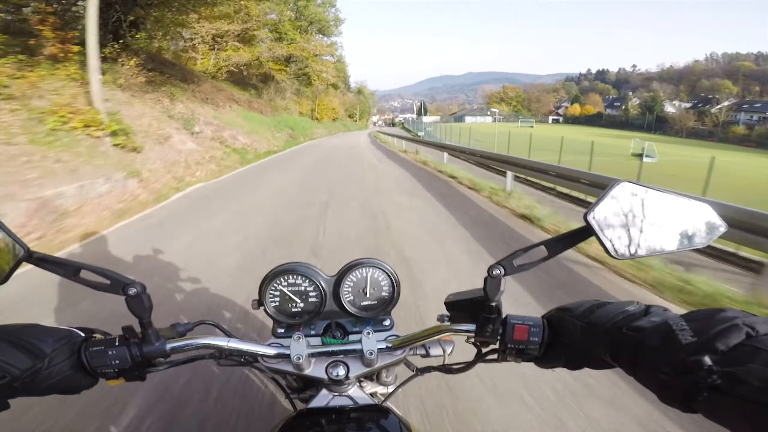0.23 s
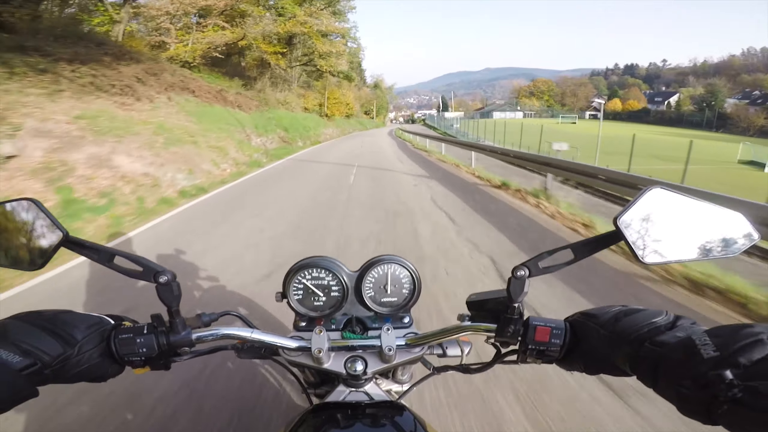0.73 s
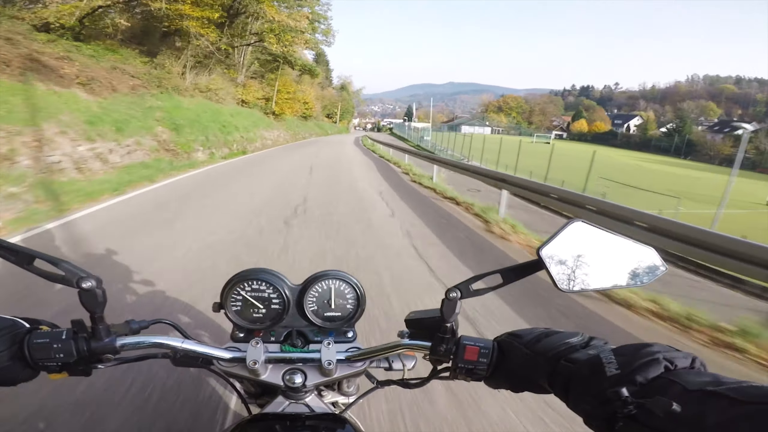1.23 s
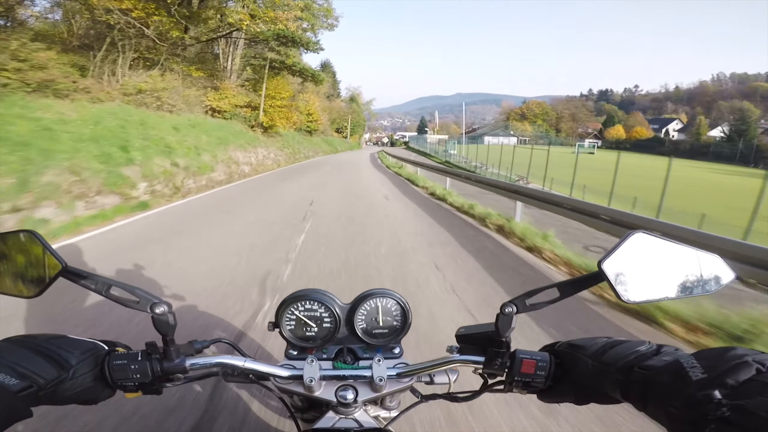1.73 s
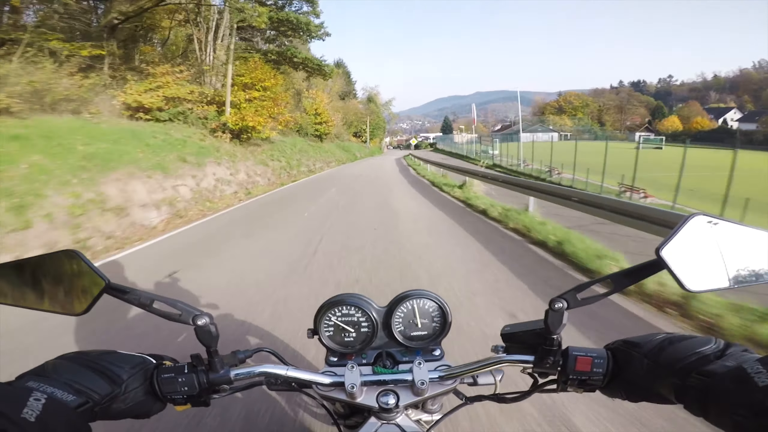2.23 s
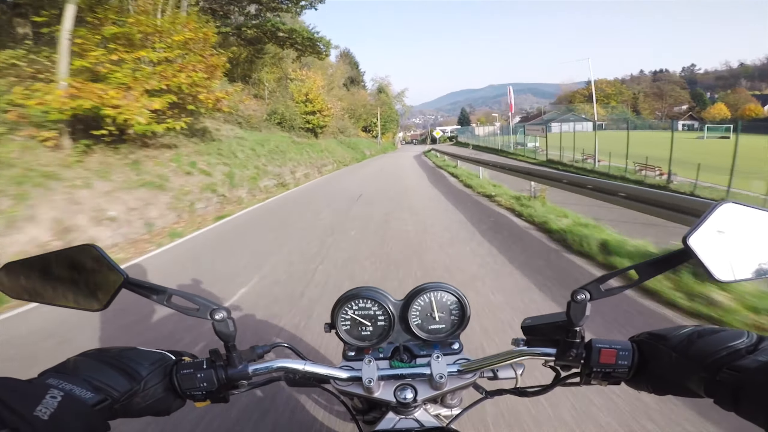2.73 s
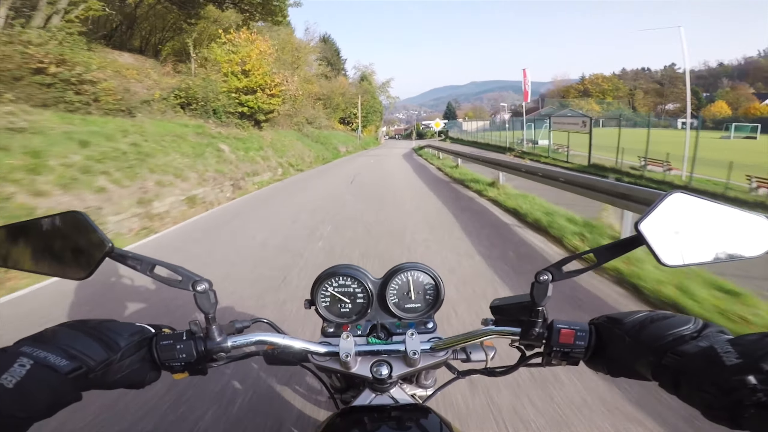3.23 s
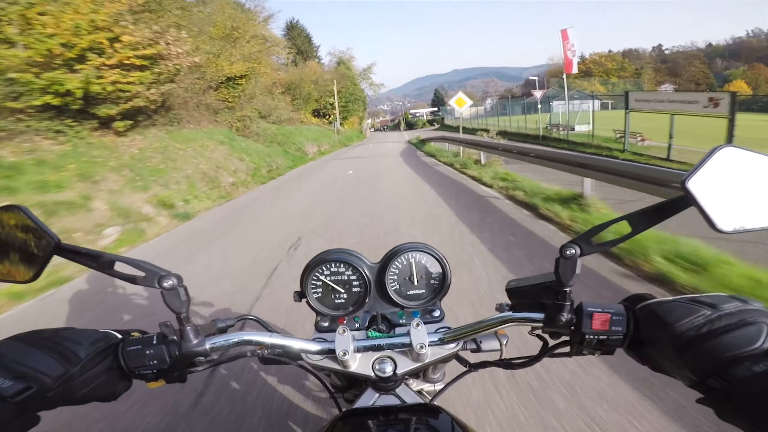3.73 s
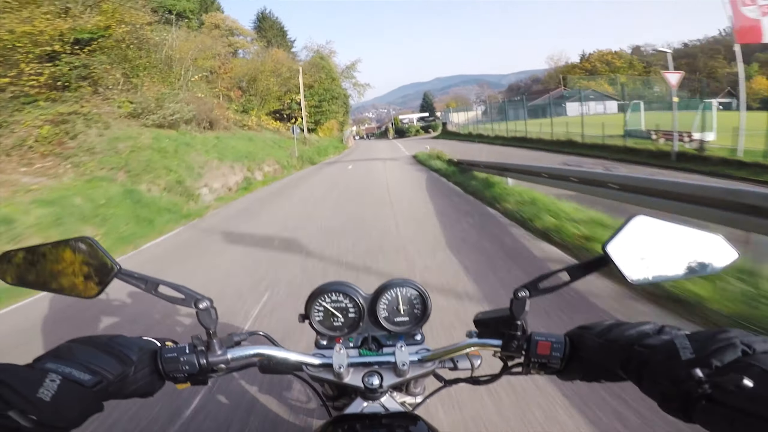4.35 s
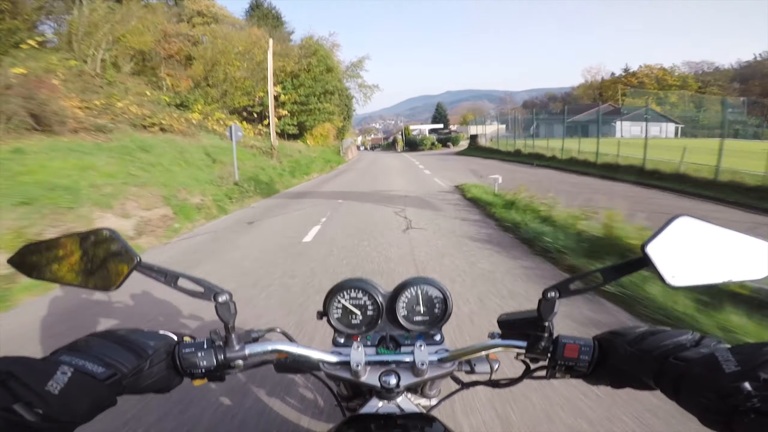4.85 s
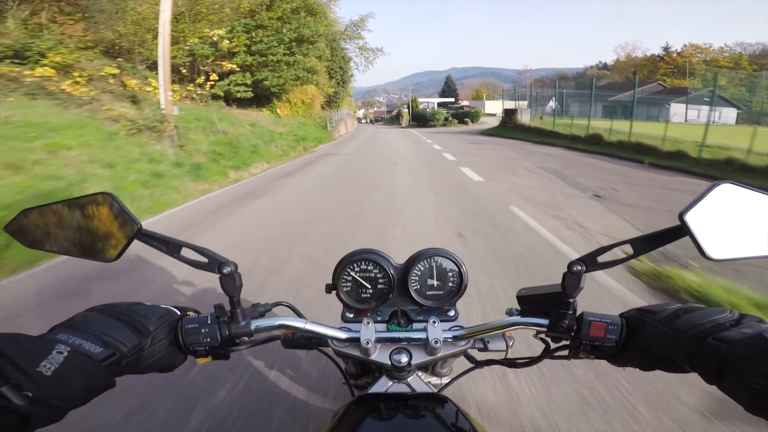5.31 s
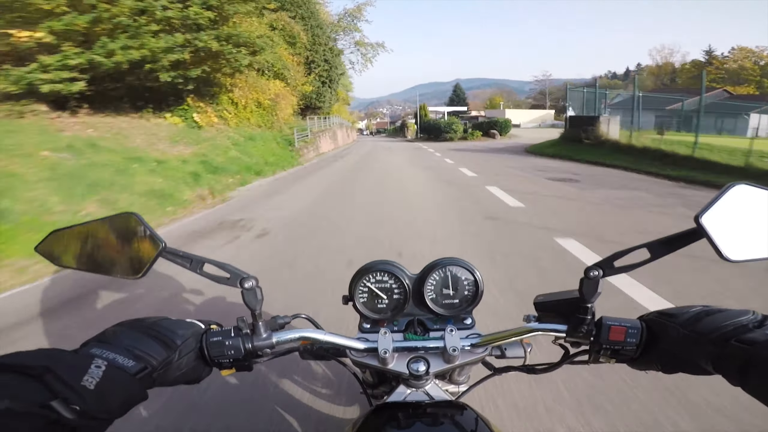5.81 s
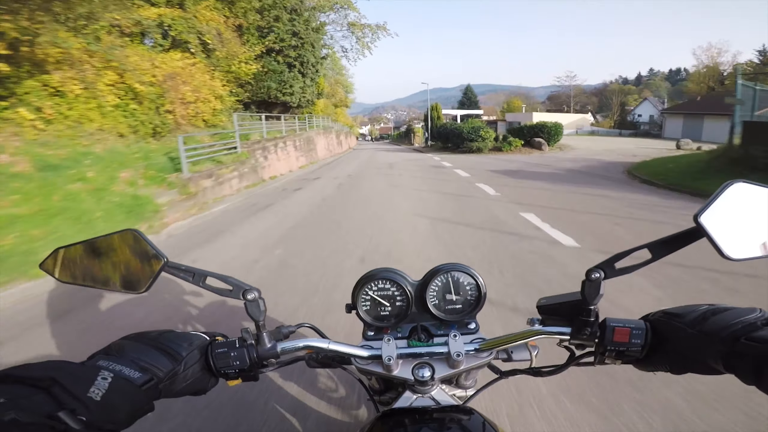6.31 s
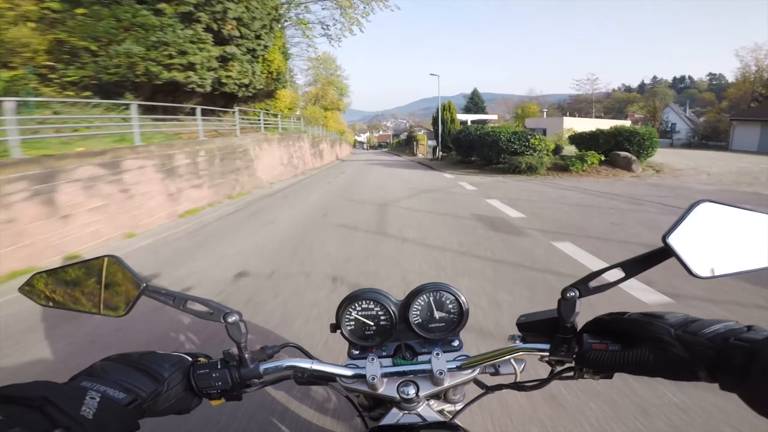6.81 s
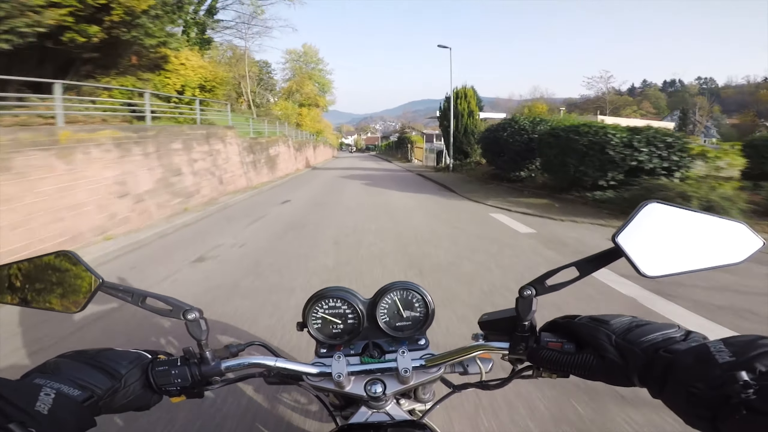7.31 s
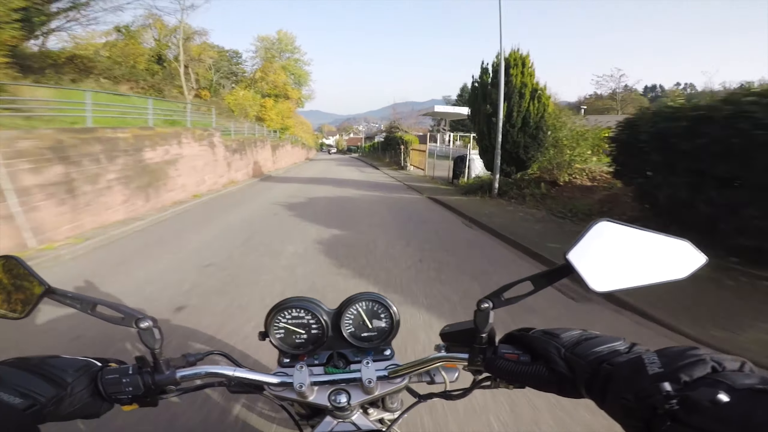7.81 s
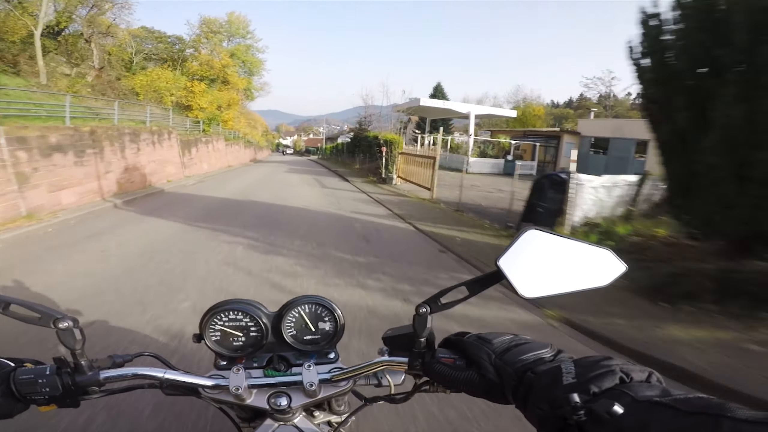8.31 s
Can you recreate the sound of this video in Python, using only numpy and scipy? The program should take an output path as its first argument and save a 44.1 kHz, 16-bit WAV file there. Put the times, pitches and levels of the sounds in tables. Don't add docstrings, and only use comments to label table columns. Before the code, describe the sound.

From the rider's position, a motorcycle engine burbles and crackles off throttle, barks through one brief burst of acceleration, then slows amid low wind rumble.

```python
import sys
import numpy as np
from scipy import signal
from scipy.fft import rfft, irfft, next_fast_len
from scipy.io import wavfile
from scipy.ndimage import map_coordinates

SR = 44100
rng = np.random.default_rng(int(sys.argv[2]) if len(sys.argv) > 2 else 0)


def undo_db(level):
    steps = np.asarray(level, float) / 20
    return 10 ** steps


def materialize(psi):
    bounded = np.clip(np.atleast_2d(psi).T, -1, 1)
    quanta = np.round(bounded * 32767).astype(np.int16)
    wavfile.write(sys.argv[1], SR, quanta)


N = 377937
MID_HZ = 44.57

# t/s, cycle rate f/Hz
SPEED = [(0,52.95),(.4,51.97),(.75,50),(1.1,49.17),(2.25,45.7),(2.98,44.16),(3.25,45.53),(3.63,47.41),(3.75,49.7),(3.96,52),(4.14,52.68),(4.4,50.78),(5.5,46.82),(5.72,46.8),(6.5,43.98),(7.8,40.24),(8.05,40.2),(8.57,38.18)]
# t/s, opening/0-1
THROTTLE = [
    (2.93, 0.07),
    (3.03, 0.14),
    (3.15, 0.62),
    (3.23, 0.44),
    (3.6, 0.67),
    (3.74, 0.83),
    (4.08, 0.81),
    (4.16, 0.2),
    (4.22, 0.02),
]
# t/s, swing f/Hz, half length/s
SNATCH = [
    (3.139, 2.5, .09),
    (4.25, -3, .07),
]
FIRING = [0, .25]
# f/Hz, level/dB
COOL_PIPE = [(33, -42), (52, -24.5), (100, -15.5), (117, -1), (132, -16), (165, -18), (193, -14.5),
             (214, -30), (252, -19.5), (270, -12.5), (295, -25), (350, -33.5), (450, -42), (800, -59.5)]
# f/Hz, width/Hz, level/dB, polarity
HOT_PIPE = [(52, 9.1, -4, 0.99), (232, 20, 6, 1), (410, 59, 4, 0.96), (650, 22, 4, 0.84),
            (328, 600, -7, 0.33), (731, 63, -8.5, 0.4), (1030, 140, -14.5, 1)]
# f/Hz, width/Hz, level/dB, polarity
CHAMBERS = [(45.5, 29, -3.5, 1), (139.6, 8.8, -5.5, -1.06), (189.6, 23, 2.5, 0.9), (336, 24, -5.5, -1.24),
            (480, 31, -6.5, 0.93)]
# t/s, can ring level/dB, crack level/dB
POPS = [(0.255, -6.5, -14), (0.56, -6, -3), (0.605, 2.5, 0), (0.782, 0, 0.5), (0.982, -0.5, -8),
        (1.006, -6, -10), (1.147, 1.5, 3), (1.286, -7, -13), (1.46, -12, -16), (1.792, -2, -3),
        (2.155, -2.5, -5), (2.195, -5, -8.5), (2.354, -2, -4), (2.48, -7, -9.5), (2.665, 0, 0.5),
        (2.8, -13, -16), (2.883, -14, -19), (3.662, -10, -10), (4.759, -28, -20), (5.122, -22, -24),
        (6.132, -17.5, -20), (6.442, -10.5, -10), (6.697, -11, -23), (6.973, -4.5, -12), (7.207, -5, -18),
        (7.45, -1, -9), (7.775, -14, -22.5), (8.174, -10.5, -20), (8.324, -9, -16), (8.503, -5, -12)]
# f/Hz, width/Hz, level/dB, polarity
CAN = [(272, 69, 6, 0.69), (610, 300, -23, 1)]
# f/Hz, level/dB per Hz
RASP = [(300, -16), (650, -11), (1200, 12.5), (2000, -5.5), (3200, -16.5)]
# t/s, push level/dB
THUMPS = [(0.606, -3), (0.821, -5.5), (0.983, -7), (1.166, -2), (1.286, -8), (2.156, -14.5), (2.353, -4.5),
          (2.48, -12), (2.685, -2), (2.798, -3), (2.916, -4), (2.937, -16), (4.156, -7), (5.123, -7.5),
          (6.131, -6.5), (6.241, -12), (6.44, -3), (6.697, -9), (7.206, -7), (7.449, -7), (7.792, -5.5),
          (8.173, -5.5), (8.324, -6), (8.502, -12)]
# f/Hz, width/Hz, level/dB, polarity
PIPE_SWING = [(88, 24, -1, 0.91), (150, 126, -4.5, -2.7)]
# f/Hz, width/Hz, level/dB, polarity
CASES = [(588, 53, 3.5, 0.97), (687.6, 60, 4.5, -0.93), (1107, 126, -5, -0.77), (1295, 160, -6.5, 0.9),
         (1708, 160, -1.5, -0.47), (2330, 420, -10.5, 0.54), (2730, 660, -13, -0.58)]
# multiple, level/dB above valve gear
MESH = [(2, -10), (3, -15), (4, -22)]
# t/s, level/dB
STREAM = [(0.05, -67.5), (0.57, -68), (2.07, -67), (2.54, -69), (3.48, -63.5), (4.12, -69), (4.59, -68),
          (6.0, -70), (6.33, -77.5), (6.8, -71), (7.86, -70), (8.5, -74.5)]
# f/Hz, level/dB per Hz
RUMBLE = [(20, -30), (40, -4), (65, -2), (110, -4), (160, -10), (290, -10), (400, -16), (800, -24),
          (1500, -32), (3000, -50)]
# f/Hz, level/dB per Hz
HISS = [(2000, 2), (3000, -7.5), (3600, -7.5), (4700, -2), (5600, -7.5), (6300, -8.5), (7200, -12),
        (8200, -17), (9300, -24.5), (10500, -36.5), (12500, -47.5)]
# f/Hz, width/Hz, level/dB, polarity
VENTS = [(2360, 67, -2.5, 1), (4640, 310, 2, 0.84), (6360, 120, 3, -1)]
# f/Hz, level/dB per Hz
WHISTLE = [(9000, -38), (11500, 1.5), (13200, 5), (15200, -21.5), (16000, -40.5)]


def engine():
    t = np.arange(N) / SR
    snatch = sum(hz * np.clip(1 - np.abs(t - s) / half_s, 0, 1) for s, hz, half_s in SNATCH)
    return curves(SPEED)[0] + snatch, np.clip(curves(THROTTLE)[0], 0, 1)


def exhaust(cycle, speed_hz, opening):
    bangs = strokes(cycle, FIRING, [1, .25], scatter_db=.9, jitter=.001)
    return (coasting_puffs(cycle, speed_hz, opening)
            + silencer_boom(bangs, opening)
            + combustion_bark(bangs, cycle, speed_hz, opening))


def coasting_puffs(cycle, speed_hz, opening):
    off_peak = (speed_hz - 49.1) / 3.8
    level = undo_db(-10.5 - 3 * off_peak ** 2 / (1 + np.abs(off_peak))) * (1 - opening) ** 2.7
    cooled = np.clip((47.5 - speed_hz) / 9.7, 0, 1)
    onward = np.append(cycle, cycle[-1] + speed_hz[-1] * np.arange(1, SR // 5) / SR)

    def through_pipe(sizes, tuning):
        puffs = strokes(onward, FIRING, sizes, scatter_db=.35, jitter=.001)
        spread = filtered(puffs, lambda f: np.exp(1j * (f / 42) ** 2 / (1 + f / 600)))
        return unit(causal(spread, [(hz * tuning, db) for hz, db in COOL_PIPE])[:N])

    warm = through_pipe([1, 0.51], 1)
    cold = through_pipe([1, 0.71], 0.932)
    return level * ((1 - cooled) * warm + cooled * undo_db(3) * cold)


def silencer_boom(bangs, opening):
    boom = low_pass(resonate(bangs, CHAMBERS), 370, order=1)
    return undo_db(-11.5) * opening ** 0.85 * (1 - 0.51 * opening ** 4.8) * unit(boom)


def combustion_bark(bangs, cycle, speed_hz, opening):
    misfire_db = -39.5 - 0.97 * (speed_hz - MID_HZ)
    level = undo_db(-13.5) * opening ** 4.8 + undo_db(misfire_db)
    roar = rng.standard_normal(N) * np.exp(-4 * (cycle % 1))
    bark = unit(resonate(bangs, HOT_PIPE)) + undo_db(-9) * unit(resonate(roar, HOT_PIPE[2:]))
    return level * unit(low_pass(bark, 680, order=1))


def afterfire():
    lit_s, ring_db, front_db = np.transpose(POPS)
    out_s = lit_s + .0015
    crack_db = -22.5 + front_db
    ring = low_pass(resonate(impulses(out_s, undo_db(ring_db + 35.5)), CAN), 570, order=1)
    crack = filtered(impulses(out_s, undo_db(crack_db + 35.5)),
                     lambda f: 1j * f / 350 / (1 + 1j * f / 350) / (1 + 1j * f / 700))
    fading = filtered(impulses(out_s, undo_db(crack_db - 10.5)),
                      lambda f: SR * 0.014 / (1 + 2j * np.pi * f * 0.0084))
    crack += fading * noise(RASP)
    crack += 0.18 * np.roll(crack, 130) - 0.26 * np.roll(crack, 310)
    deep_s, push_db = np.transpose(THUMPS)
    push = low_pass(resonate(impulses(deep_s, undo_db(push_db + 35)), PIPE_SWING), 290, order=1)
    return ring + crack + push


def valve_gear(cycle, speed_hz, opening):
    level_db = -40 + 0.7651 * (speed_hz - MID_HZ) + 0.5 * opening
    seat_angles, seat_sizes = [.04, .17, .31, .52, .63, .86], [1, -.6, .8, -.9, .5, .7]
    ticks = strokes(cycle + 1, seat_angles, seat_sizes, scatter_db=.9, jitter=.0004)
    gas = rng.standard_normal(N) * (1 + 0.15 * np.cos(2 * np.pi * cycle - 1.1))
    cases = undo_db(-1.5) * unit(resonate(ticks, CASES)) + undo_db(-6) * unit(resonate(gas, CASES))
    tooth = 2 * np.pi * 12 * cycle
    mesh = sum(undo_db(db + 0.7 * wobble(2.7)) * np.sin(k * tooth) for k, db in MESH)
    cover = 1 / (1 + ((12 * speed_hz - 574) / 27) ** 4)
    whine = cover * undo_db(-30.5 + 2.0 * wobble(12)) * np.sin(tooth)
    return undo_db(level_db) * (cases + mesh) + whine


def wind(speed_hz, opening):
    stream_db = curves(STREAM)[0]
    stream_db = stream_db - stream_db.mean()
    return buffeting(speed_hz, opening) + helmet_hiss(stream_db) + slit_whistle()


def buffeting(speed_hz, opening):
    level_db = -26.5 + 0.55 * (speed_hz - MID_HZ) - 5.5 * opening
    lumps = undo_db(1.2 * wobble(2.7) + 2.0 * wobble(25))
    return undo_db(level_db) * unit(lumps * noise(RUMBLE))


def helmet_hiss(stream_db):
    vents = resonate(resonate(rng.standard_normal(N), VENTS), VENTS)
    air = noise(HISS) + undo_db(-14.5) * unit(vents)
    body = filtered(air, lambda f: 1 / (1 + (f / 7500) ** 6))
    fizz = undo_db(.7 * stream_db) * (air - body)
    level_db = -51.5 + 0.43 * stream_db + 0.43 * wobble(8.8) + 0.47 * wobble(60)
    return undo_db(level_db) * (body + fizz)


def slit_whistle():
    start_s, rise_s, rest_db, full_db = 7.55, .45, -103, -75.5
    onset = np.clip((np.arange(N) / SR - start_s) / rise_s, 0, 1)
    return undo_db(rest_db + (full_db - rest_db) * onset) * noise(WHISTLE)


def strokes(cycle, angles, sizes, scatter_db, jitter):
    count = np.arange(int(cycle[-1]))[:, None]
    chance = rng.standard_normal((2, len(count), len(angles)))
    seconds = np.interp(count + angles + jitter * chance[0], cycle, np.arange(len(cycle)) / SR)
    sizes = sizes * undo_db(scatter_db * chance[1])
    return impulses(seconds.ravel(), sizes.ravel(), size=len(cycle))


def impulses(seconds, sizes, size=N):
    at = np.clip(np.asarray(seconds) * SR, 0, size - 2)
    i = at.astype(int)
    return np.bincount(i, sizes * (1 - at + i), size) + np.bincount(i + 1, sizes * (at - i), size)


def filtered(x, response):
    m = next_fast_len(len(x) + SR // 2)
    return irfft(rfft(x, m) * response(np.fft.rfftfreq(m, 1 / SR)), m)[:len(x)]


def resonate(x, modes):
    def response(f):
        return sum(p * undo_db(db) * 1j * f * w / (c * c - f * f + 1j * f * w) for c, w, db, p in modes)
    return filtered(x, response)


def causal(x, points):
    hz, db = np.transpose([(8, -90), *points, (20000, -130)])

    def response(f):
        cepstrum = irfft(np.interp(np.log(f + 1), np.log(hz), db) * np.log(10) / 20)
        cepstrum[1:len(f)] *= 2
        cepstrum[len(f):] = 0
        return np.exp(rfft(cepstrum))
    return filtered(x, response)


def low_pass(x, hz, order):
    return filtered(x, lambda f: 1 / (1 + 1.2j * f / hz - (f / hz) ** 2) ** order)


def noise(spectrum):
    hz, db = np.transpose(spectrum)

    def colour(f):
        return undo_db(np.interp(np.log(f + 1), np.log(hz), db, -120, -120))
    return unit(filtered(rng.standard_normal(N), colour))


def wobble(rate_hz):
    knots = rng.standard_normal(int(N * rate_hz / SR) + 4)
    return map_coordinates(knots, [np.arange(N) * rate_hz / SR])


def curves(rows):
    s, *cols = np.transpose(rows)
    return [np.interp(np.arange(N) / SR, s, c) for c in cols]


def unit(x):
    return x / np.sqrt(np.mean(x ** 2) + 1e-20)


def scene():
    speed_hz, opening = engine()
    cycle = np.cumsum(speed_hz) / SR
    motor = exhaust(cycle, speed_hz, opening) + afterfire() + valve_gear(cycle, speed_hz, opening)
    housed = low_pass(motor, 3290, order=3)
    return (housed + wind(speed_hz, opening))[None]


def top_cut(x):
    return signal.sosfilt(signal.butter(12, 15300, fs=SR, output="sos"), x)


def record(dry):
    soft = dry / (1 + np.abs(dry / .8) ** 6) ** (1 / 6)
    return top_cut(soft)


dry = scene()
out = record(dry)
materialize(out)
```